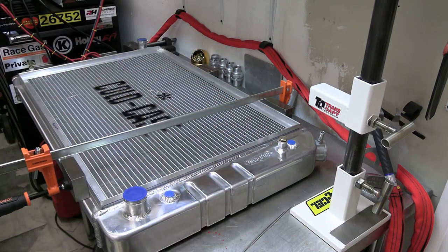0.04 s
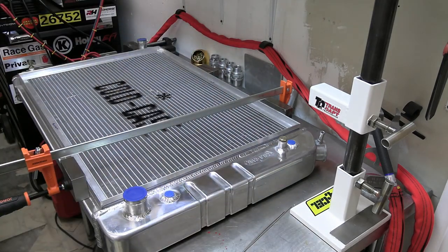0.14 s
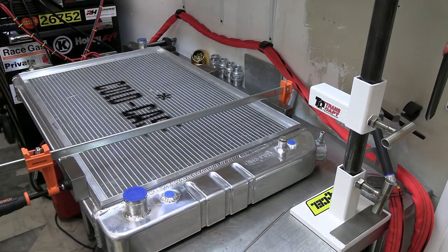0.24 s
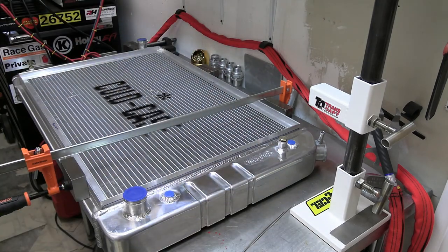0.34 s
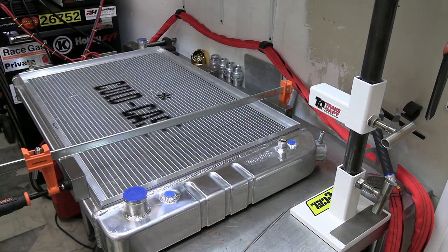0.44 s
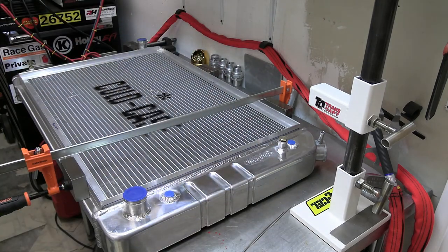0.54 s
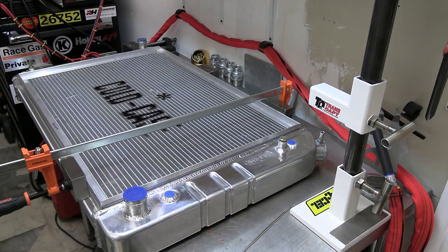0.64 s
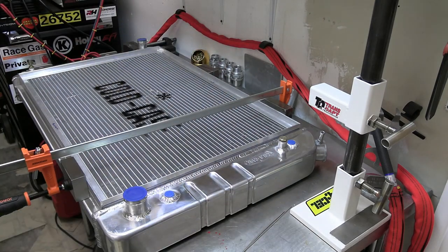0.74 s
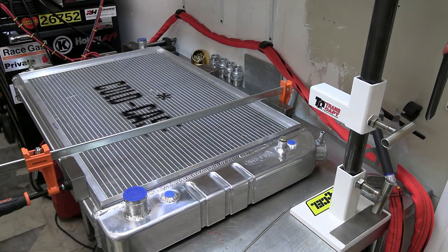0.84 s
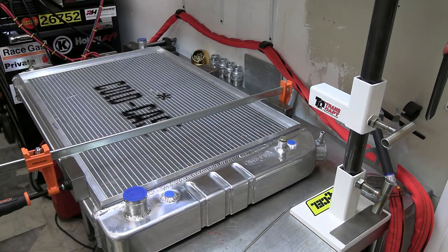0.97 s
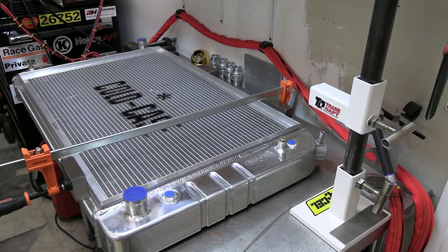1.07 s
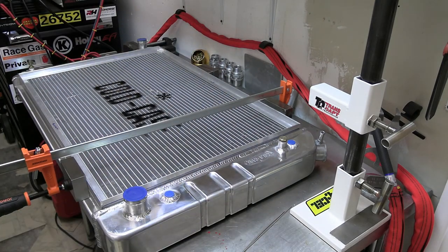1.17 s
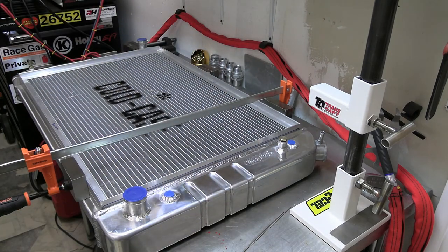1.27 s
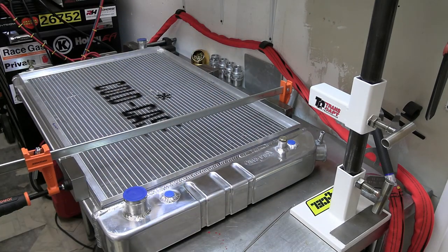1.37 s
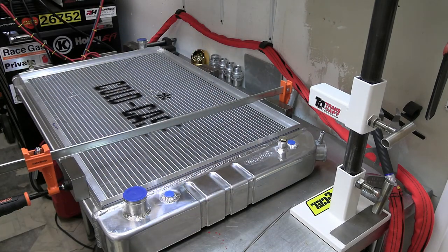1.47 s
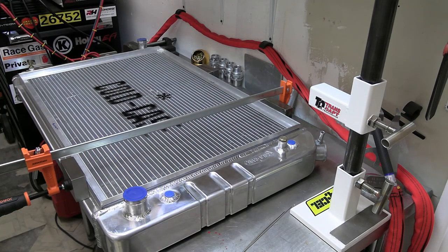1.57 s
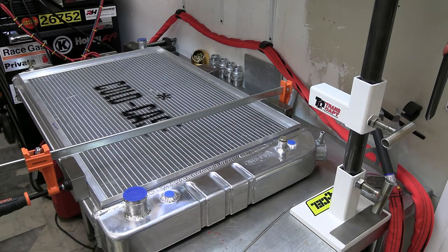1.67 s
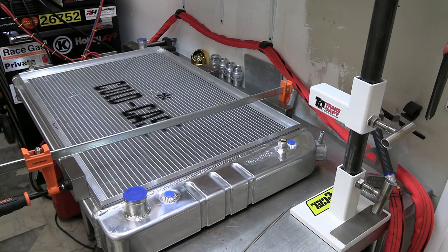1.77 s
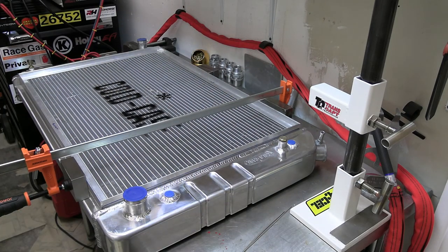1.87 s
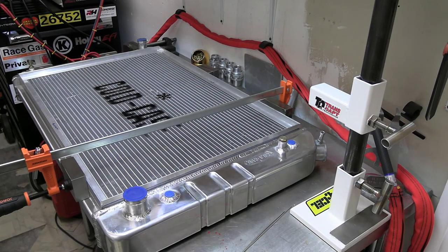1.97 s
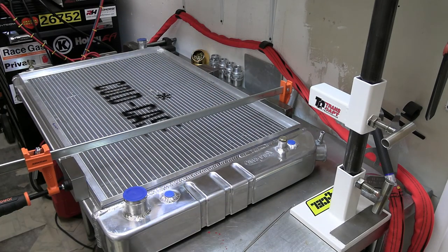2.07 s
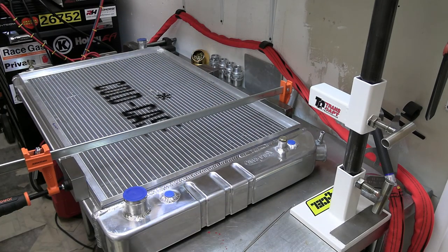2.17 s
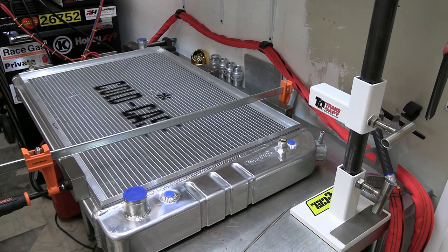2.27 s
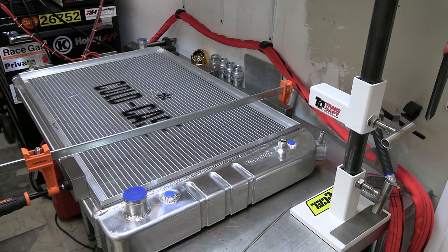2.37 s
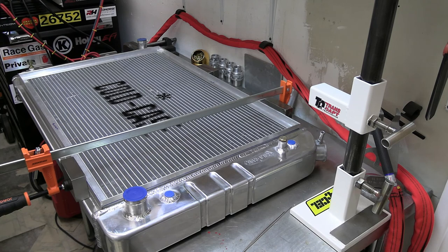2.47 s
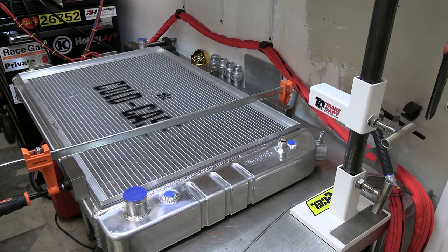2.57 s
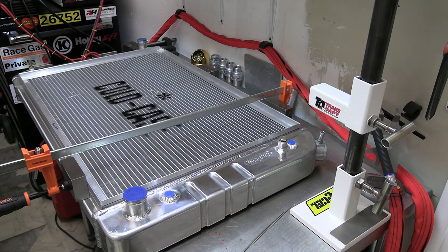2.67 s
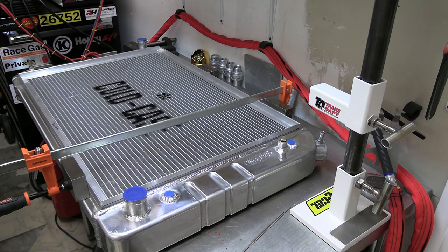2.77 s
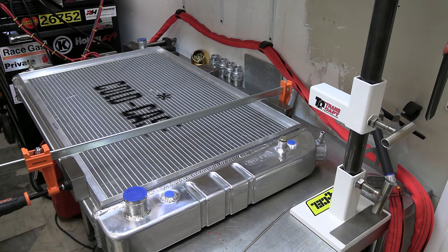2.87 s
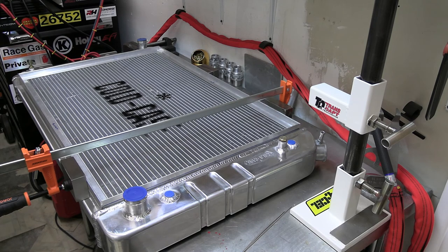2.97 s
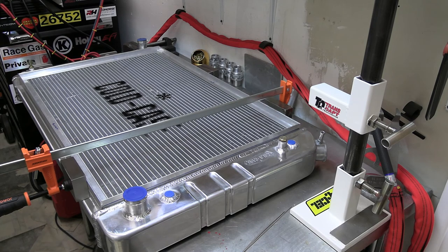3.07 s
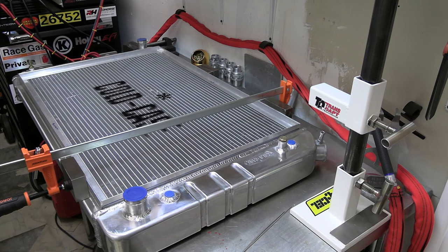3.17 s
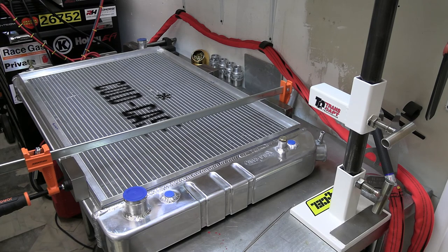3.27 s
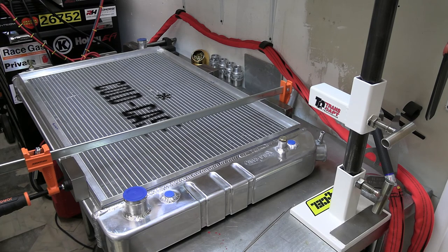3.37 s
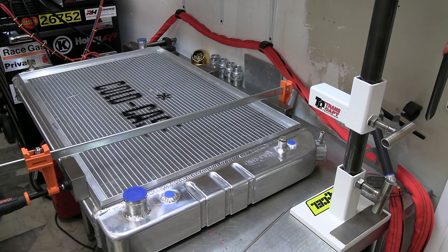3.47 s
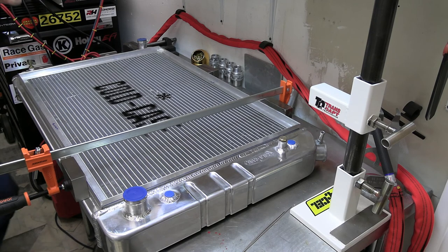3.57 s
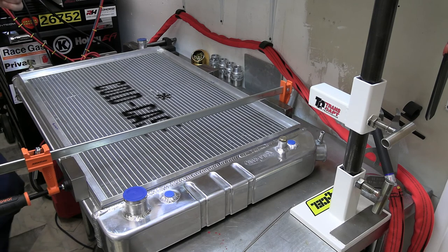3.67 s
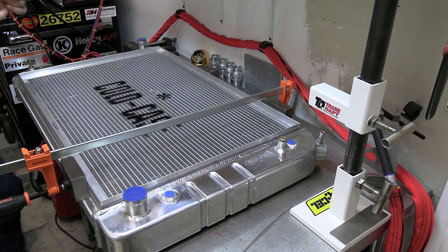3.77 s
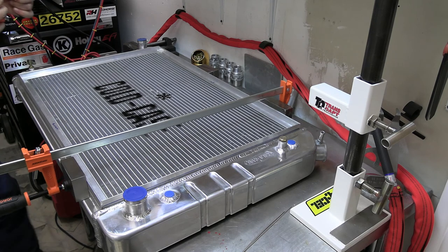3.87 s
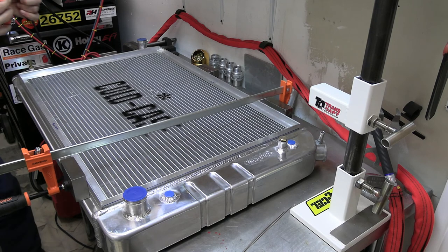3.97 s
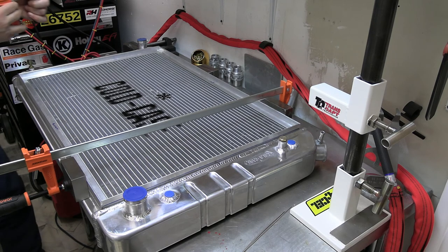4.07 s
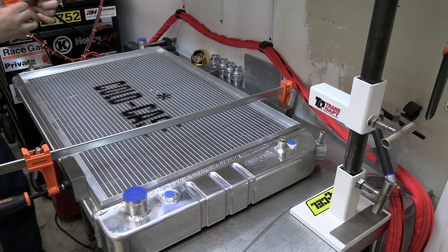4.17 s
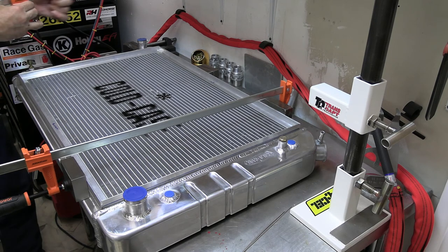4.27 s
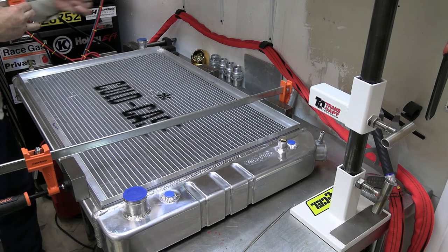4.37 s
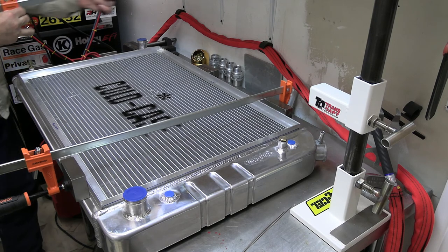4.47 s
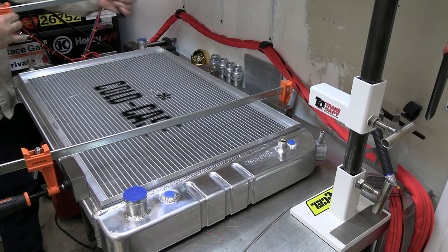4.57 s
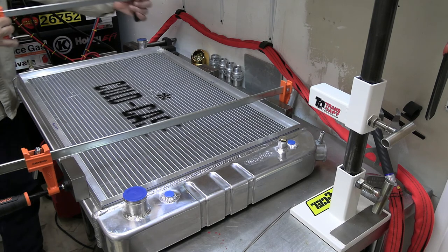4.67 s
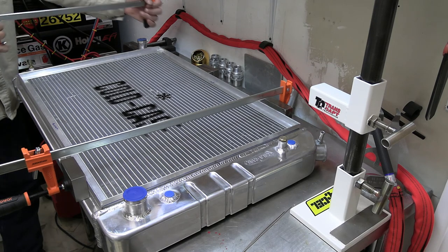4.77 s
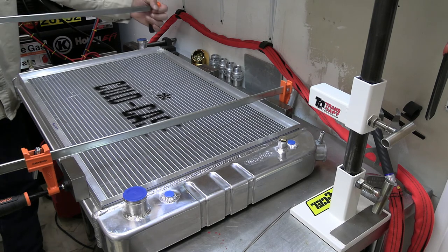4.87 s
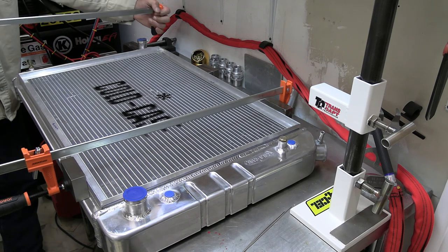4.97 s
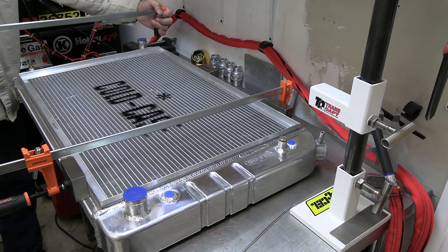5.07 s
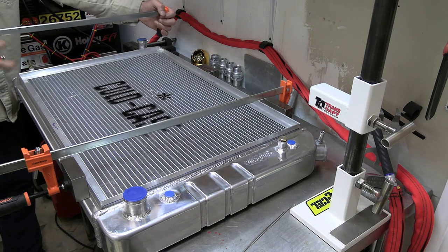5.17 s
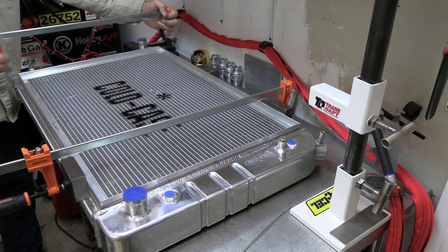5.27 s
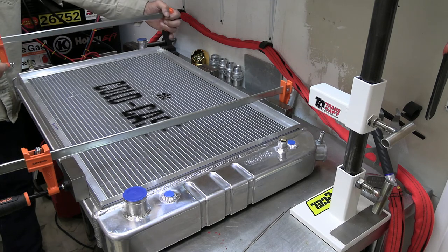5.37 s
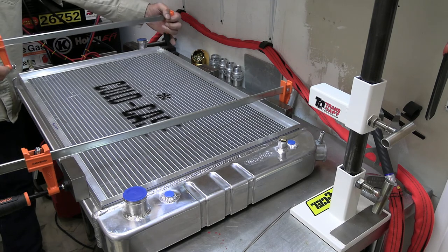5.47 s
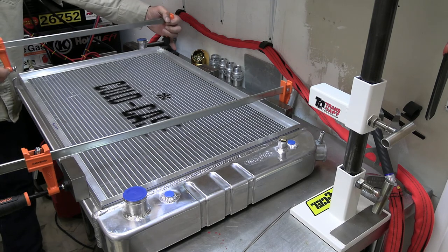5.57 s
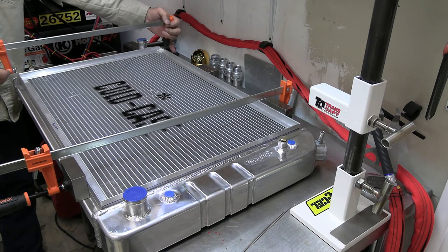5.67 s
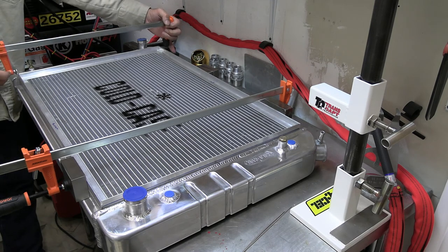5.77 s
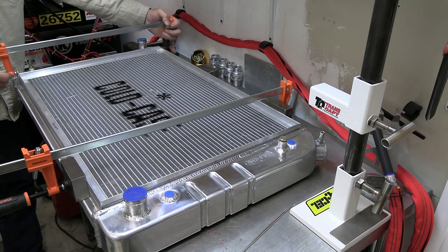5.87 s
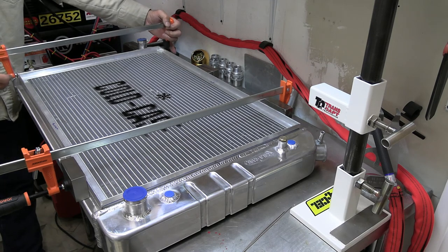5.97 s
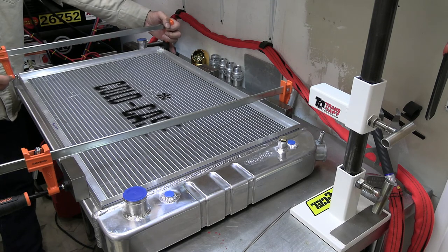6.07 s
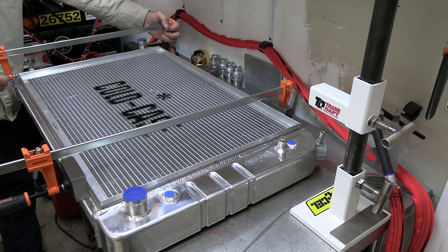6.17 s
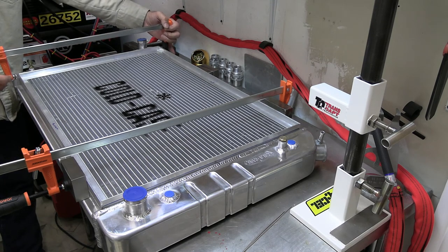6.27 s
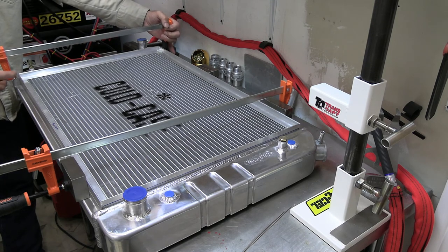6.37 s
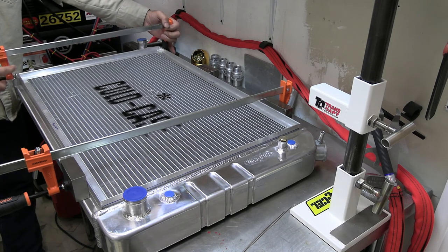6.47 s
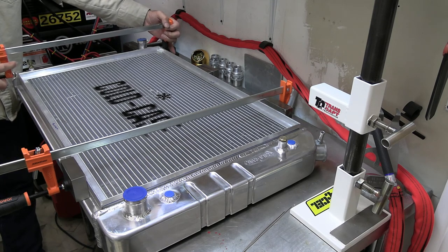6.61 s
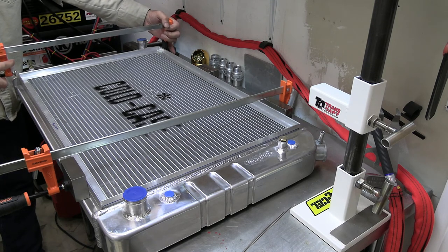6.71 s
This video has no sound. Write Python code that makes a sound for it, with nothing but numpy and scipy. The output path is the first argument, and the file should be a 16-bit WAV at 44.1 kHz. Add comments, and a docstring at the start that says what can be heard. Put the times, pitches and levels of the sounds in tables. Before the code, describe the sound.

A small workshop with short, dense reflections, heard close and nearly mono, over a constant low ventilation rush and gently wavering hum near 250 Hz. Faint taps at 0.1-0.4 s lead to sharp steel clinks at 0.48 and a bright ringing one at 0.76. The loudest heavy knocks land around 1.02-1.05 s with clinking, then chattering rattles from 1.23 to 1.5 and a deep bench thump at 1.7, with a softer one at 1.83. From 2.0 to 4.2 s only small taps, a muted tick at 3.23 and very faint rubbing. At 4.41 a bright ringing clack, then from about 4.48 to 4.92 s a loud grinding slide: an initial squeal fades as whines glide up and down and the scrape brightens. It stops quickly; a faint touch near 5.05 and a crisp double click at 5.37-5.38, then just the hum to about 6.5 s.

```python
"""Small, humming workshop: bar clamps are picked up and set over an aluminium radiator.
Filtered noise and wavering tones make the ventilation; bursts of tiny contacts ring steel modes as clinks,
and bench modes as a heavy clamp knocks down. Then friction noise, gliding whines, a squeal and echoes in the
bar make a jaw's ringing scrape, and it clicks into place. A limiter pushes the room down under loud sounds."""
import sys
import numpy as np
from scipy import signal
from scipy.fft import rfft, irfft
from scipy.io import wavfile
from scipy.ndimage import uniform_filter1d

SR = 44100
rng = np.random.default_rng(int(sys.argv[2]) if len(sys.argv) > 2 else 0)


def master_out(mix):
    """Clip the mix to full scale and print it as 16-bit PCM to the path in sys.argv[1]."""
    frames = np.transpose(np.atleast_2d(mix))
    ceiling = np.clip(frames, -1, 1)
    pcm = np.round(ceiling * 32767).astype(np.int16)
    wavfile.write(sys.argv[1], SR, pcm)


N = 297234
TIME = np.arange(N) / SR

# spectrum of steel contact noise: freq_hz, level_db (per Hz, relative)
METAL_SPECTRUM = [(100, 13), (2500, 2.5), (5000, 1.5), (6600, -6.5), (10000, -8), (14500, -11),
                  (16000, -21)]
# free modes of the clamp jaw: freq_hz, width_hz, level_db (relative)
JAW_MODES = [(2480, 73, 7), (2552, 40, 5.5)]


def amp(db):
    """Decibels to gain."""
    return 10 ** (np.asarray(db) / 20)


def unit(x):
    """Scale to rms 1."""
    return x / np.sqrt(np.mean(x ** 2) + 1e-20)


def read(points, hz):
    """Interpolate a table on a log-frequency axis."""
    freq_hz, value = np.transpose(points)
    return np.interp(np.log(hz + 1), np.log(freq_hz), value)


def add(mix, start_s, sound):
    """Mix a sound in at start_s."""
    part = mix[round(start_s * SR):][:len(sound)]
    part += sound[:len(part)]


def colour(x, spectrum):
    """Causal (minimum-phase) filter with the given spectrum."""
    hz = abs(np.fft.fftfreq(4096, 1 / SR))
    log_gain = np.log(amp(read(spectrum, hz)))
    response = np.exp(np.conj(signal.hilbert(log_gain)))
    impulse = np.fft.ifft(response).real[:len(hz) // 2]
    return signal.fftconvolve(x, impulse)[:len(x)]


def edge(x, hz, kind, order):
    """Butterworth low-pass or high-pass."""
    return signal.sosfilt(signal.butter(order, hz, kind, fs=SR, output="sos"), x)


def band(x, low_hz, high_hz, low_pass_order=2):
    """Second-order high-pass, then a low-pass."""
    return edge(edge(x, low_hz, "high", order=2), high_hz, "low", order=low_pass_order)


def ring(x, modes):
    """Drive a bank of two-pole resonances; a wider mode dies sooner."""
    out = np.zeros(len(x))
    for hz, width_hz, db in modes:
        r = np.exp(-np.pi * width_hz / SR)
        poles = [1, -2 * r * np.cos(2 * np.pi * hz / SR), r * r]
        out += amp(db) * signal.lfilter([1 - r, 0, r - 1], poles, x)
    return out


def strike(modes):
    """Free ring of a body after one sharp push."""
    return unit(ring(signal.unit_impulse(SR // 2), modes))


def glide(x, hz, width_hz):
    """Resonance that follows the curve hz: shift down, filter at zero, shift back."""
    turn = np.exp(2j * np.pi * np.cumsum(hz) / SR)
    r = np.exp(-np.pi * width_hz / SR)
    return (turn * signal.lfilter([1], [1, -2 * r, r * r], x / turn)).real


def chatter(decay_s, spiky):
    """Burst of tiny contacts, clumped into small uneven impacts, that dies away."""
    t = TIME[:SR // 2]
    sign, size = rng.standard_normal((2, len(t)))
    clumps = unit(uniform_filter1d(size, size=56))
    return sign * np.exp(spiky * clumps - t / decay_s)


def blow(x, db):
    """Set the energy of a blow, as a level over 25 ms."""
    return amp(db) * x * np.sqrt(.025 * SR / np.sum(x ** 2))


def workshop(x, gap_s=0.0034):
    """Dense reflections from near walls, each band dying at its own speed."""
    # reverberation: freq_hz, t60_s
    room_t60 = [(100, 0.21), (500, 0.36), (2500, 0.19), (5000, 0.28), (8000, 0.28), (15000, 0.23)]
    hz, t, z = signal.stft(rng.standard_normal(SR), SR, nperseg=256)
    tail = signal.istft(z * amp(-60 * t / read(room_t60, hz)[:, None]), SR)[1]
    # silent for one gap, full after two
    tail = tail * np.clip(TIME[:len(tail)] / gap_s - 1, 0, 1)
    return signal.fftconvolve(x, tail / np.linalg.norm(tail))[:N]


def background(rush_db=-35, waver=0.21, drift_hz=1.23, draught_db=-47, hiss_db=-65):
    """Ventilation: a low rush with a few wavering tones, and each microphone's own faint hiss."""
    # rush spectrum: freq_hz, level_db (per Hz, relative)
    air_spectrum = [(8, -8.5), (17, 5.5), (22, -1.5), (31, -6.5), (75, -14), (150, -19), (200, -16),
                    (250, -17.5), (350, -18.5), (600, -27), (1000, -31), (2000, -36), (4800, -42.5),
                    (7000, -50.5), (15000, -63.5)]
    # steady hum: pitch_hz, level_db
    hum_tones = [(260, -44.5), (241.3, -51), (318.6, -57), (113.5, -55)]
    hz = np.fft.rfftfreq(N, 1 / SR)
    air_gain = amp(read(air_spectrum, hz))
    rush, side = (unit(irfft(rfft(z) * air_gain, N)) for z in rng.standard_normal((2, N)))
    mid = amp(rush_db) * rush
    slow = 1 / (1 + (hz / 3) ** 4)
    for tone_hz, db in hum_tones:
        swell, drift = (unit(irfft(rfft(z) * slow, N)) for z in rng.standard_normal((2, N)))
        turns = np.cumsum(tone_hz + drift_hz * drift) / SR
        mid = mid + amp(db) * np.sqrt(2) * (1 + waver * swell) * np.sin(2 * np.pi * turns)
    # mainly the deepest rumble differs between the channels
    draught = amp(draught_db) * unit(edge(side, 6.1, "low", order=1))
    hiss = amp(hiss_db) * rng.standard_normal((2, N))
    return mid * amp([[.4], [-.4]]) + np.array([[1], [-1]]) * draught + hiss


def rustle(low_hz=1300, clumping=0.3, level_db=-54):
    """Light rubbing while the next clamp is taken up: fine grains in clumps that swell, hold and fade."""
    start_s, end_s, attack_s, release_s = 2.37, 4.88, 0.62, 0.97
    grains, clumps = rng.standard_normal((2, N))
    grains = grains * np.exp(clumping * unit(uniform_filter1d(clumps, size=250)))
    rise, fade = (TIME - start_s) / attack_s, (end_s - TIME) / release_s
    envelope = np.clip(np.minimum(rise, fade), 0, 1)
    rubbing = unit(edge(colour(grains, METAL_SPECTRUM), low_hz, "high", order=1))
    return amp(level_db) * envelope * rubbing


def taps(spread=1.4):
    """Small parts touch as the clamps are handled: short band-limited bursts of contacts."""
    # handling taps: start_s, level_db, centre_hz, chatter_decay_s
    tap_events = [(.124, -47, 1080, 0.0051), (.171, -45.5, 740, 0.0025), (0.395, -50, 5600, 0.004),
                  (2.026, -43.5, 805, .0072), (2.087, -41, 1970, 0.014), (2.213, -43.5, 1330, 0.017),
                  (2.324, -42, 750, 0.0071), (2.46, -47, 3950, .0055), (3.059, -48.5, 4330, .003),
                  (3.226, -34, 1010, 0.02), (3.229, -42.5, 7300, .035), (3.953, -49, 1500, 0.0043),
                  (3.955, -49.5, 6960, 0.027), (4.005, -49, 1200, .003), (4.041, -43, 2850, 0.013),
                  (4.164, -42.5, 4170, .011)]
    out = np.zeros(N)
    for start_s, db, hz, decay_s in tap_events:
        contact = colour(chatter(decay_s, spiky=0.23), METAL_SPECTRUM)
        add(out, start_s, blow(band(contact, hz / spread, hz * spread), db))
    return out


def clinks(thud_db=-15, grip_damping=1.2, spread=1.79, sympathy_db=-27):
    """Steel chatters on steel and rings the hand-damped jaw, the bar or the latch, over a soft thud."""
    # steel on steel: start_s, level_db, centre_hz, chatter_decay_s, ringing_part, ring_db (re crack)
    clink_events = [(.4755, -20.5, 1980, .02, "jaw", -10), (0.479, -17, 1250, 0.0015, "jaw", 7.5),
                    (.591, -35.5, 1160, 0.0092, "jaw", -23), (0.7584, -19.5, 4060, 0.025, "bar", -5),
                    (1.093, -12.5, 1800, 0.028, "jaw", -10), (1.127, -21.5, 1680, 0.047, "jaw", -21),
                    (1.250, -21.5, 1570, .087, "jaw", -7), (1.336, -24, 1630, 0.096, "latch", -25),
                    (1.381, -18, 3120, 0.023, "latch", -13), (1.51, -31.5, 2760, 0.025, "jaw", -6),
                    (4.413, -18, 4500, .0068, "jaw", 11), (4.414, -17, 4600, 0.0084, "latch", 3),
                    (5.054, -32.5, 7500, .0044, "latch", -11), (5.372, -23, 3430, 0.0048, "latch", 3.5),
                    (5.3835, -22, 5270, 0.0047, "latch", 1.5)]
    # bar modes: freq_hz, width_hz, level_db (relative)
    bar_modes = [(3480, 20, -15), (4140, 13, 3), (4760, 18, 0), (5211, 15, -3), (5620, 35, 4),
                 (6340, 21, -4), (7000, 11, -9)]
    # latch modes: freq_hz, width_hz, level_db (relative)
    latch_modes = [(3245, 50, 11.5), (3540, 81, 2), (4370, 240, 4.5), (4700, 220, 1), (4670, 74, -1),
                   (6950, 95, 6), (8090, 90, -5.5)]
    held_jaw = [(hz, width_hz * grip_damping, db) for hz, width_hz, db in JAW_MODES]
    parts = {"jaw": strike(held_jaw), "bar": strike(bar_modes), "latch": strike(latch_modes)}
    whole_clamp = unit(sum(parts.values()))
    out = np.zeros(N)
    for start_s, db, hz, decay_s, part, ring_db in clink_events:
        contact = colour(chatter(decay_s, spiky=0.11), METAL_SPECTRUM)
        crack = unit(band(contact, hz / spread, hz * spread))
        thud = unit(band(contact, 245, 910))
        rings = amp(ring_db) * parts[part] + amp(sympathy_db) * whole_clamp
        # the blow takes a moment to fill the part
        fill = 1 - np.exp(-TIME[:len(crack)] / 0.00068)
        add(out, start_s, blow(fill * (crack + rings + amp(thud_db) * thud), db))
    return out


def knocks(ring_db=-2):
    """A heavy clamp lands: one push rings the bench while loose parts rattle."""
    # heavy knocks: start_s, level_db, low_edge_hz, high_edge_hz, rattle_decay_s
    knock_events = [(.568, -30.5, 253, 1770, 0.041), (0.773, -28, 151, 925, 0.077),
                    (1.019, -8, 250, 960, 0.01), (1.027, -6, 200, 790, 0.011),
                    (1.054, -10.5, 159, 580, 0.0043), (1.229, -18.5, 170, 450, 0.018),
                    (1.244, -21, 129, 880, 0.016), (1.261, -24.5, 162, 1500, 0.072),
                    (1.690, -19, 40.4, 714, 0.0073), (1.700, -8.5, 45.3, 1710, 0.031),
                    (1.826, -23.5, 36, 356, 0.069), (3.953, -32.5, 70, 696, 0.008),
                    (4.005, -36.5, 60, 700, 0.0072), (5.04, -32.5, 126, 590, 0.0049)]
    # bench modes: freq_hz, width_hz, level_db (relative)
    bench_modes = [(62, 20, 8), (127.6, 16, 6), (175.4, 4, 4.5), (225, 38, 6), (353.7, 34, 4.5),
                   (377, 32, -0.5), (421, 41, -8), (510, 68, 1), (674, 22, -7), (914, 11, -4),
                   (1455, 15, 3.5), (1845, 70, -6)]
    out = np.zeros(N)
    bench = strike(bench_modes)
    for start_s, db, low_hz, high_hz, decay_s in knock_events:
        rattle = colour(chatter(decay_s, spiky=0.29), METAL_SPECTRUM)
        rattle = unit(band(rattle, low_hz, high_hz, low_pass_order=1))
        body = unit(band(bench, low_hz, high_hz, low_pass_order=1))
        # the padded jaw lands softly
        onset = 1 - np.exp(-TIME[:len(body)] / 0.0011)
        impact = edge(rattle + amp(ring_db) * body, 11000, "low", order=1)
        add(out, start_s, blow(onset * impact, db))
    return out


def wandering(x, modes, wander_db=4):
    """Modes swell and fade at random, as for a contact sliding past their nodes."""
    swells = rng.standard_normal((len(modes), N))
    swells = uniform_filter1d(uniform_filter1d(swells, size=1500), size=1000)
    return sum(ring(x * amp(wander_db * unit(swell)[:len(x)]), [mode]) for mode, swell in zip(modes, swells))


def push(t, start_s, let_go_s, db, attack_s, held_db_per_s, coast_db_per_s=233):
    """Friction under one push: it builds, holds, then coasts away."""
    held_s = np.clip(t, start_s, let_go_s) - start_s
    coasting_s = np.maximum(t - let_go_s, 0)
    build = np.clip((t - start_s) / attack_s, 0, 1)
    return build * amp(db + held_db_per_s * held_s - coast_db_per_s * coasting_s)


def whine(x, travel, start_hz, octaves, db, antinode, width_hz):
    """One bending mode: glides with the length of bar, swells as the jaw crosses its antinodes."""
    antinode_spacing = 0.79  # share of the travel
    radiates_above_hz = 1320  # the narrow bar gives off less sound below this
    pitch_hz = start_hz * 2 ** (octaves * travel)
    coupling = np.cos(np.pi * (travel - antinode) / antinode_spacing) ** 2
    radiation = np.minimum(pitch_hz / radiates_above_hz, 1) ** 3
    return amp(db) * coupling * radiation * unit(glide(x, pitch_hz, width_hz))


def squealing(slip, travel, start_db=0, free_at_travel=0.32, fade_db_per_travel=56, free_db=-20):
    """The cocked jaw squeals by stick-slip, fading once it has travelled far enough to run free."""
    faded_db = start_db - fade_db_per_travel * np.maximum(travel - free_at_travel, 0)
    squeal = unit(ring(ring(slip, JAW_MODES), JAW_MODES))
    # stick-slip holds its own swing
    swing = np.sqrt(abs(signal.hilbert(squeal)) ** 2 + .5)
    return amp(np.maximum(faded_db, free_db)) * unit(squeal / swing)


def slide(ring_db=2, whine_width_hz=100, groan_db=-26, groan_width_hz=45, echo=0.64, judder_db=1.68, spiky=0.37):
    """The jaw grinds along the bar; its travel sweeps whines and a comb through the bar's ring."""
    # two nudges, then the long shove: start_s, let_go_s, friction_db, attack_s, held_change_db_per_s
    pushes = [(4.334, 4.392, -37.5, 0.0027, 242), (4.447, 4.48, -21.5, 0.0057, -8),
              (4.48, 4.919, -5.5, 0.0051, -15)]
    # the jaw speeds up and slows down between: start_s, end_s
    travel_s = (4.41, 4.94)
    # grit spectrum: freq_hz, level_db (per Hz, relative)
    grit_spectrum = [(100, -55), (400, -30), (900, -23), (1300, -4), (2800, -2.5), (5000, 4), (6000, -7.5),
                     (8700, -20), (11000, -12), (12800, -43), (15000, -30), (15500, -38)]
    # modes of the rubbed clamp: freq_hz, width_hz, level_db (relative)
    rubbed_modes = [(1286, 41, -8), (3280, 34, 3), (3485, 105, 2), (4240, 120, 2.5), (4596, 130, 5.5),
                    (5020, 240, 0.5), (5580, 120, 6), (6400, 170, 1), (6820, 60, 2), (7550, 48, -15),
                    (8050, 25, -1.5), (9200, 100, -5.5), (10200, 29, -1.5), (9740, 37, -5),
                    (11100, 32, -23), (11170, 25, -38), (14000, 130, -25), (15300, 82, -47)]
    # bending modes, rising ahead of the jaw and falling behind it:
    # start_hz, octaves (over the travel), level_db, antinode (travel 0-1)
    whine_modes = [(1209, .89, -11, 0.02), (1548, .7, -10.5, 0.23), (1790, -1.49, -20, 0.09),
                   (2376, -1.2, -14, 0.49)]
    stop_s = 5.105  # the jaw comes to rest
    echo_start_ms, echo_end_ms = 1.266, 2.965  # round trip along the freed length of bar

    t = np.arange(pushes[0][0], stop_s, 1 / SR)
    friction = sum(push(t, *row) for row in pushes)
    travel = np.sin(np.pi / 2 * np.interp(t, travel_s, [0, 1])) ** 2
    echo_ms = echo_start_ms * (echo_end_ms / echo_start_ms) ** travel
    grit, size, judder, slip, catch = rng.standard_normal((5, len(t)))
    grip = amp(judder_db * unit(uniform_filter1d(judder, size=300)))
    grit = grit * np.exp(spiky * unit(uniform_filter1d(size, size=20)))
    rub = unit(colour(grit, grit_spectrum)) + amp(ring_db) * unit(wandering(catch, rubbed_modes))
    # the freer the jaw runs, the more treble comes out
    treble_gain = 0.42875 + (1.3375 - 0.42875) * travel
    dull = edge(rub, 2400, "low", order=1)
    rub = dull + treble_gain * (rub - dull)
    # low waves return from the end of the bar, later as the jaw moves away
    wave = rub
    for _ in range(2):
        wave = echo * np.interp(t - echo_ms / 1000, t, uniform_filter1d(wave, size=11))
        rub = rub + wave
    # the two lengths of bar whine, one rising and one falling
    rub = unit(rub) + sum(whine(slip, travel, *row, whine_width_hz) for row in whine_modes)
    # the freed length groans, one cycle per round trip, louder as it grows
    growth = (echo_ms / echo_ms.max()) ** 3
    groan = unit(glide(catch, 1000 / echo_ms, groan_width_hz)) * growth
    rub = rub + amp(groan_db) * groan
    out = np.zeros(N)
    add(out, t[0], grip * friction * (rub + squealing(slip, travel)))
    return out


def scene(tap_wet_db=-2, clink_wet_db=-6, knock_wet_db=-7, slide_wet_db=-8, side_db=-23):
    """All sources in the room, heard almost in mono."""
    sources = [(taps() + rustle(), tap_wet_db), (clinks(), clink_wet_db),
               (knocks(), knock_wet_db), (slide(), slide_wet_db)]
    mid = sum(x + amp(wet_db) * workshop(x) for x, wet_db in sources)
    side = amp(side_db) * edge(workshop(sum(x for x, _ in sources)), 2200, "high", order=1)
    return background() + mid * amp([[-.3], [.3]]) + np.array([[1], [-1]]) * side


def record(dry, threshold_db=-13, squeeze=0.71, level_fall_db_per_s=55, ceiling=.88, cutoff_hz=15700):
    """Quick limiter on a falling peak-hold level, soft peak rounding and the band limit."""
    power = uniform_filter1d((dry ** 2).mean(0), size=300)
    power_db = 10 * np.log10(abs(power) + 1e-12)
    fall_db = TIME * level_fall_db_per_s
    held_db = np.maximum.accumulate(power_db + fall_db) - fall_db
    over_db = np.maximum(held_db - threshold_db, 0)
    ducked = dry / amp(squeeze * uniform_filter1d(over_db, size=100))
    rounded = ducked / (1 + (ducked / ceiling) ** 6) ** (1 / 6)
    low_pass = signal.firwin(511, cutoff_hz, window=("kaiser", 9), fs=SR)
    return signal.oaconvolve(rounded, low_pass[None], "same")


dry = scene()
out = record(dry)
master_out(out)
```